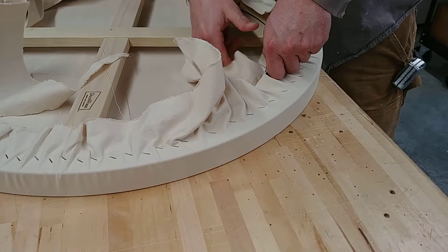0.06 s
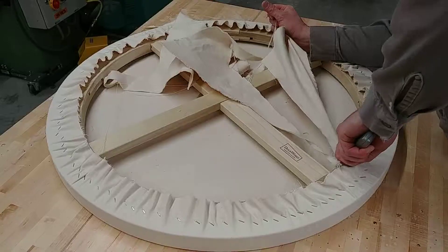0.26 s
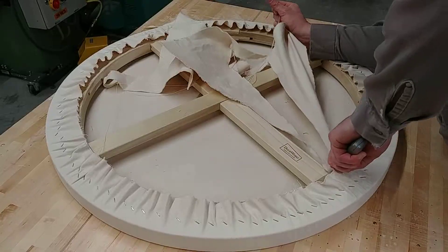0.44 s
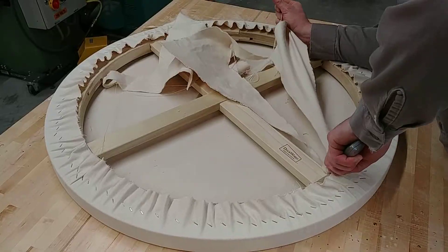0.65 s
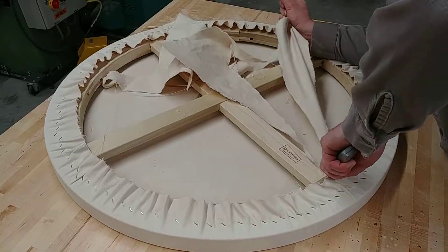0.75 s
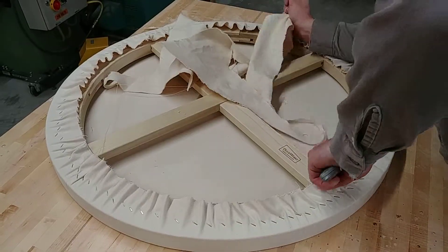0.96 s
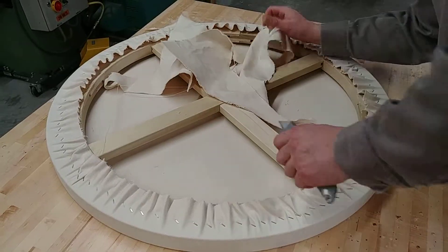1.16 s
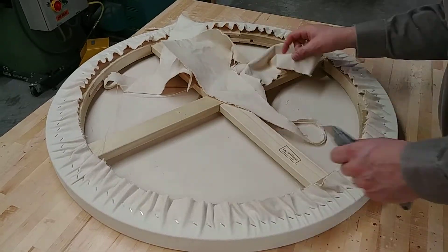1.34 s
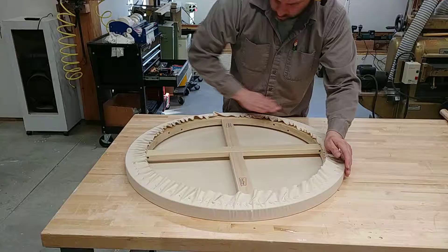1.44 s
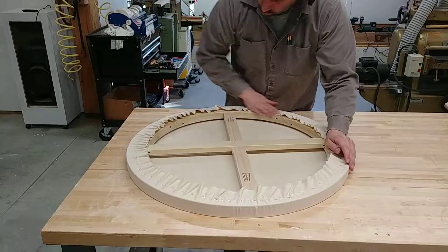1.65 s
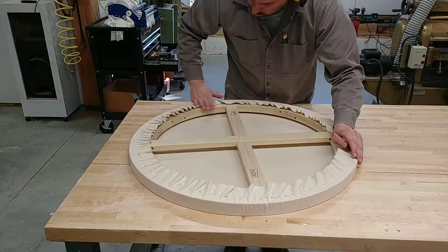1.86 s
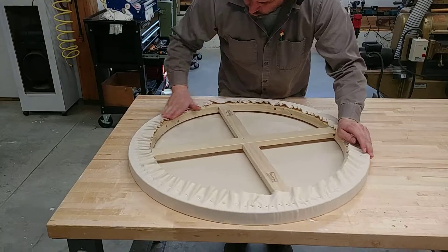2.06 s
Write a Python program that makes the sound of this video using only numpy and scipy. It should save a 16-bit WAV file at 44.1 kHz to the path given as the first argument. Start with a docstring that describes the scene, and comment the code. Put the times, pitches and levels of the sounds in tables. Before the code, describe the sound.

A knife cuts canvas in four harsh strokes, then cloth and hands brush softly.

```python
"""In a dry workshop, a knife trims spare canvas from a round wooden stretcher in four short strokes.
Threads snap one by one under the juddering blade and excite the modes of the frame. At 0.87 s the last
stroke ends in a knock on the wood. Friction then takes over: the cut strip is pulled away, cloth and
hands brush over the taut canvas, which drums softly, and from 1.6 s the frame slides on the bench."""
import sys
import numpy as np
from scipy import signal
from scipy.fft import rfft, irfft
from scipy.io import wavfile
from scipy.ndimage import uniform_filter1d

SR = 44100
rng = np.random.default_rng(int(sys.argv[2]) if len(sys.argv) > 2 else 0)


def generate_wav(signal):
    """Clip the signal to [-1, 1] and save it as 16-bit WAV at the path in sys.argv[1]."""
    frames = np.transpose(np.atleast_2d(signal))
    scaled = np.clip(frames, -1, 1) * 32767
    pcm = np.round(scaled).astype(np.int16)
    wavfile.write(sys.argv[1], SR, pcm)


N = 92610
T = np.arange(N) / SR


def amp(db):
    """Amplitude ratio of a level in decibels."""
    return 10 ** (np.asarray(db) / 20)


def unit(x):
    """Normalisation to rms 1."""
    return x / np.sqrt(np.mean(x ** 2))


def unit_energy(x):
    """A response of unit energy passes white noise at the same level."""
    return x / np.sqrt(np.sum(x ** 2))


def convolve(x, response):
    """Superposition: each sample of x launches a copy of the impulse response."""
    return signal.fftconvolve(x, response)[:N]


def on_log_axis(hz, points_hz, values):
    """Linear interpolation over log frequency."""
    return np.interp(np.log(hz + 1), np.log(np.sort(points_hz)), values)


def colour(x, points):
    """Minimum-phase filter through (frequency_hz, gain_db) points."""
    hz, db = np.array(points).T
    bins_hz = np.arange(N + 1) * SR / (2 * N)
    cepstrum = irfft(np.log(amp(on_log_axis(bins_hz, hz, db))))
    cepstrum[1:N] *= 2  # folding onto positive time makes the filter causal
    cepstrum[N + 1:] = 0
    return irfft(rfft(x, 2 * N) * np.exp(rfft(cepstrum)))[:N]


def clicks(rows):
    """Impulsive excitation, one impulse for each (time_s, level_db)."""
    out = np.zeros(N)
    for at, db in rows:
        out[int(at * SR)] += amp(db)
    return out


def ring(hz, t60):
    """Free decay of one damped mode."""
    return unit_energy(np.sin(2 * np.pi * hz * T) * np.exp(-np.log(1000) * T / t60))


def burst(decay_s):
    """Exponential decay of white noise."""
    return unit_energy(rng.standard_normal(N) * np.exp(-T / decay_s))


def effort(rows, edge_s):
    """Amplitude envelope: each stroke passes through three levels and has Gaussian edges."""
    out = np.zeros(N)
    for start, mid, end, *levels_db in rows:
        outside_s = np.maximum(start - T, 0) + np.maximum(T - end, 0)
        level = amp(np.interp(T, [start, mid, end], levels_db))
        out = np.maximum(out, level * np.exp(-(outside_s / edge_s) ** 2))
    return out


def grains(per_s, scatter_db):
    """Shot noise: random tiny clicks of uneven size, rms 1."""
    size = amp(scatter_db * np.clip(rng.standard_normal(N), -2, 2))
    polarity = np.sign(rng.standard_normal(N))
    return unit(size * polarity * (rng.random(N) < per_s / SR))


# Spectrum of the workshop's background: frequency_hz, gain_db
AIR_SPECTRUM = [(30, -65), (70, 1), (200, 7), (500, 7), (1500, -2), (4000, -2), (7500, -10), (11000, -5.5),
                (16000, 1.5)]
AIR_DB, AIR_START_S = -51, .191


def air():
    """Stationary noise: a faint background that sets in just before the first stroke."""
    return amp(AIR_DB) * colour(rng.standard_normal(N) * (T > AIR_START_S), AIR_SPECTRUM)


# Reverberation by band: frequency_hz, t60_s, level_db
ROOM_BANDS = [(150, 0.38, 4.5), (500, 0.59, 1.5), (1430, 0.52, 0), (4300, 0.35, 3), (8100, 0.32, -2.5),
              (14000, 0.24, -5.5)]
BENCH_DB, BENCH_DECAY_S, ROOM_GAP_S = -11.5, 0.003, 0.0069


def workshop(x, room_db):
    """Reverberation: direct sound, early bench reflections, then a tail whose treble dies first."""
    hz, _, cells = signal.stft(rng.standard_normal(N), SR, nperseg=256)
    band_hz, t60, db = np.array(ROOM_BANDS).T
    age = np.linspace(0, N / SR, cells.shape[1])
    decay = np.exp(-np.log(1000) * age / on_log_axis(hz, band_hz, t60)[:, None])
    gain = amp(on_log_axis(hz, band_hz, db))[:, None]
    diffuse = signal.istft(cells * decay * gain, SR)[1][:N]
    tail = unit_energy(diffuse * (T > ROOM_GAP_S))
    return x + convolve(x, amp(BENCH_DB) * burst(BENCH_DECAY_S) + amp(room_db) * tail)


# Modes of the taut canvas: pitch_hz, bandwidth_hz, level_db
CANVAS_MODES = [(67.1, 2.1, 0.5), (137.3, 17, -5.5), (194, 71, -11.5)]
# Hands pressing on it: start_s, mid_s, end_s, start_db, mid_db, end_db
HAND_PRESSES = [(.88, .90, 1.03, -34, -40, -53), (1.16, 1.19, 1.23, -56, -46.5, -63),
                (1.30, 1.38, 2, -56, -54.5, -63), (1.73, 1.76, 2, -37, -40, -52),
                (1.835, 1.865, 1.895, -39, -36, -40), (1.95, 1.98, 2.06, -51, -47.5, -45)]
CANVAS_IDLE_DB = -59.5


def drumming():
    """Forced vibration of a membrane: rubbing hands keep the low modes of the canvas sounding."""
    out = np.zeros(N)
    for hz, width, db in CANVAS_MODES:
        pole = np.exp((2j * hz - width) * np.pi / SR)
        mode = signal.lfilter([1], [1, -pole], rng.standard_normal(N))
        steadied = mode.real / (np.abs(mode) + np.std(mode) / 2)
        out += amp(db) * unit(steadied)
    idle = amp(CANVAS_IDLE_DB) * (T > AIR_START_S)
    return out * np.maximum(effort(HAND_PRESSES, edge_s=0.015), idle)


# Light touches of fingers and knife handle: time_s, tick_db, thud_db
LIGHT_TOUCHES = [(1.467, -44, -15), (1.627, -23, -20)]


def touches():
    """Impulse response of a membrane: each touch gives a tick and a damped thud of the canvas."""
    thud = sum(amp(db) * ring(hz, t60=0.085) for hz, _, db in CANVAS_MODES)
    ticks = clicks([(at, db) for at, db, _ in LIGHT_TOUCHES])
    pushes = clicks([(at, db) for at, _, db in LIGHT_TOUCHES])
    return ticks + convolve(pushes, thud)


# Brushed cloth, pulled strip, sliding frame: start_s, mid_s, end_s, start_db, mid_db, end_db
CLOTH_SWISHES = [(.87, .91, 1.12, -37, -48, -55), (1.152, 1.19, 1.222, -49.5, -47, -47.5),
                 (1.356, 1.452, 1.456, -44.5, -38, -42.5), (1.60, 1.67, 1.69, -60, -47, -39),
                 (1.695, 1.855, 1.95, -41, -36, -40), (1.95, 2.06, 2.205, -43, -41.5, -37)]
STRIP_PULLS = [(.89, .935, 1.025, -21, -14, -37), (.99, 1.055, 1.113, -34, -27, -38),
               (1.13, 1.21, 1.33, -41, -37, -58)]
FRAME_SLIDES = [(1.635, 1.69, 1.85, -44, -38.5, -47.5), (1.91, 2.05, 2.12, -36.5, -27.5, -29.5)]
# Their spectra, in turn bright, hollow and dull: frequency_hz, gain_db
CLOTH_SPECTRUM = [(60, -23), (300, 0), (700, -4), (1500, 0), (2400, 3), (3400, 5), (4500, -1.5), (5600, -1),
                  (7600, -5.5), (9500, -2), (13000, -1.5), (16000, -10)]
STRIP_SPECTRUM = [(60, -5), (180, -5.5), (280, -2.5), (380, 7), (480, -1), (580, -11.5), (700, -7.5),
                  (900, -14.5), (2000, -27), (16000, -45)]
SLIDE_SPECTRUM = [(60, -21.5), (200, -3), (420, 0.5), (750, 1), (1300, 0.5), (2000, -9.5), (4000, -27),
                  (16000, -49)]


def rubbing():
    """Friction noise: the nap of the cloth and the sliding frame catch in dense tiny grains."""
    def rub(moves, spectrum):
        return colour(grains(per_s=7000, scatter_db=0.5) * effort(moves, edge_s=0.013), spectrum)

    cloth = rub(CLOTH_SWISHES, CLOTH_SPECTRUM)
    strip = rub(STRIP_PULLS, STRIP_SPECTRUM)
    return cloth + strip + rub(FRAME_SLIDES, SLIDE_SPECTRUM)


# The blade juddering against the frame: start_s, mid_s, end_s, start_db, mid_db, end_db
BLADE_JUDDERS = [(.20, .24, 0.26, -39.5, -39, -38), (.263, .288, 0.33, -32.5, -29.5, -47.5),
                 (.455, .481, 0.51, -33.5, -35, -41), (.70, .705, .722, -38, -41.5, -36),
                 (.815, .83, .852, -49, -41, -44)]
JUDDER_HZ, JUDDER_WOBBLE_HZ, JUDDER_ROUGHNESS = 534.3, 21.6, .25


def judder():
    """Stick-slip oscillation: the hard-pressed blade gives a woody note of unsteady pitch."""
    wobble, rough = (unit(uniform_filter1d(rng.standard_normal(N), size=256)) for _ in range(2))
    phase = 2 * np.pi * np.cumsum(JUDDER_HZ + JUDDER_WOBBLE_HZ * wobble) / SR
    note = unit(np.sin(phase) * (1 + JUDDER_ROUGHNESS * rough))
    return note * effort(BLADE_JUDDERS, edge_s=0.0033)


# Modes of the wooden frame: pitch_hz, t60_s, under_blade_db, in_knock_db
FRAME_MODES = [(120.7, 0.14, -21.5, -22), (218.7, 0.22, -25, -7.5), (340.3, 0.16, -18.5, -12.5),
               (385, 0.098, -27, -13.5), (488, 0.056, -22, -8), (526, 0.044, -28, -13),
               (646, 0.31, -25.5, -19.5), (858, 0.047, -15, -19), (1022, 0.02, -16.5, -21.5),
               (1141, 0.066, -34, -16.5), (1591, 0.03, -27, -9.5), (1925, 0.017, -15, -14),
               (2144, .03, -44, -17.5), (3207, 0.044, -16.5, -52), (3640, 0.016, -19.5, -30)]
UNDER_BLADE, IN_KNOCK = 2, 3  # level columns


def frame(column):
    """Modal superposition: the frame's response, neighbouring modes swinging opposite ways."""
    return sum((-1) ** k * amp(mode[column]) * ring(hz=mode[0], t60=mode[1])
               for k, mode in enumerate(FRAME_MODES))


# Spectrum of the knock's crack: frequency_hz, gain_db
CRACK_SPECTRUM = [(100, 2), (2000, 1.5), (5000, -0.5), (7500, -4.5), (11000, -3), (16000, -16)]
KNOCK_S, KNOCK_DB, KNOCK_CRACK_DB = .8665, 10, -7


def knock():
    """Impact excitation: the knife comes free and hits the frame with a crisp crack."""
    crack = amp(KNOCK_CRACK_DB) * colour(burst(decay_s=.0025), CRACK_SPECTRUM)
    blow = clicks([(KNOCK_S, KNOCK_DB)])
    return workshop(convolve(blow, frame(IN_KNOCK) + crack), room_db=-10.5)


# Strong threads that snap: time_s, relative_level_db
THREAD_SNAPS = [(0.2051, -4), (0.2108, 3), (.2185, -26), (.2252, -25), (.2345, -3.5), (0.2461, 3),
                (0.2552, -1.5), (0.261, 4), (.2671, -1), (0.2841, 0), (0.2977, -8), (0.4039, -2),
                (0.4427, -6), (.4574, -3), (.4610, 3), (0.466, 2), (.4670, -1), (0.4737, 1), (0.4763, 0),
                (0.4782, 1.5), (0.483, -3), (0.488, -1.5), (.5124, -5.5), (0.6894, -3), (0.6974, -6),
                (0.6994, 4), (0.7082, 1), (.7163, 1), (0.717, -28), (.7203, -37), (0.726, -6),
                (0.802, -6.5), (0.8049, -6), (0.814, -4.5), (0.826, -4), (.8377, 1), (.8420, -4),
                (0.851, -4)]
ZIP_HZ, ZIP_SPREAD_HZ, ZIP_WIDTH_S, ZIP_DB, SNAP_CRACK_DB = 7940, 740, 0.000407, -21, -7.5


def threads():
    """Sudden release of tension: each thread parts with a crack and a brief zip at its own pitch."""
    zips = np.zeros(N)
    for at, db in THREAD_SNAPS:
        age = T - at - ZIP_WIDTH_S
        near = np.abs(age) < 3 * ZIP_WIDTH_S
        hz = ZIP_HZ + ZIP_SPREAD_HZ * rng.uniform(-0.75, 1)
        tone = np.cos(2 * np.pi * (hz * age[near] + rng.random()))
        zips[near] += amp(db) * tone * np.exp(-(age[near] / ZIP_WIDTH_S) ** 2)
    return amp(SNAP_CRACK_DB) * clicks(THREAD_SNAPS) + amp(ZIP_DB) * zips


# The blade cutting canvas and bearing on wood: start_s, mid_s, end_s, start_db, mid_db, end_db
KNIFE_STROKES = [(.201, .263, 0.35, -26.5, -26.5, -42), (.404, .478, 0.51, -31.5, -27.5, -30.5),
                 (.700, .719, .728, -31, -22, -24.5), (.804, .840, 0.86, -34.5, -32.5, -34.5)]
BLADE_ON_WOOD = [(.20, .288, 0.27, -24.5, -32, -23), (.41, .48, 0.48, -36, -20, -24),
                 (.69, .72, .73, -25.5, -28, -45), (.80, .845, .865, -28, -38.5, -27)]
# Spectrum of the scraping edge: frequency_hz, gain_db
EDGE_SPECTRUM = [(40, -31.5), (120, 5), (250, 2), (550, 4), (1000, 2.5), (2000, 2.5), (3200, -1),
                 (5000, -1), (8000, -1), (11000, -0.5), (16000, -1.5)]
SCRAPE_DB, STROKE_EDGE_S, SNAP_TO_WOOD_DB = -3.5, .004, -9
FRAY_DB, FRAY_DECAY_S = -4.5, 0.0019  # loose fibres that part just after a thread


def knife():
    """Fracture and friction: the edge scrapes, parts fibres and threads, and drives the frame's modes."""
    fibres = unit(grains(per_s=1500, scatter_db=1.5) + amp(SCRAPE_DB) * rng.standard_normal(N))
    snaps = clicks(THREAD_SNAPS)
    fray_power = convolve(snaps ** 2, unit_energy(np.exp(-T / FRAY_DECAY_S)) ** 2)
    fray = np.sqrt(np.abs(fray_power)) * rng.standard_normal(N)
    cutting = fibres * effort(KNIFE_STROKES, STROKE_EDGE_S) + amp(FRAY_DB) * fray
    cloth = colour(cutting, EDGE_SPECTRUM) + threads()
    force = fibres * effort(BLADE_ON_WOOD, STROKE_EDGE_S) + amp(SNAP_TO_WOOD_DB) * snaps
    wood = convolve(force, frame(UNDER_BLADE))
    # the frame is close, so less of it comes back from the room
    return workshop(cloth, room_db=-8) + workshop(wood, room_db=-10)


def scene():
    """Linear superposition of all sources, alike in both channels."""
    mono = air() + knife() + judder() + knock() + rubbing() + drumming() + touches()
    return np.array([mono, mono])


# Response of the microphone, whose port rings near 7.6 kHz: frequency_hz, gain_db
MIC_RESPONSE = [(20, -33), (45, -5.5), (62, -2.5), (3500, -0.5), (4400, -0.5), (5600, 4), (6500, 10),
                (7300, 15.5), (8250, 12.5), (9100, 3), (10200, 1.5), (11500, -5), (13200, -9), (14800, -5),
                (16000, -11)]
PEAK_LIMIT, CUTOFF_HZ = .95, 15900


def record(dry):
    """Port resonance lifts the treble, soft saturation rounds the peaks and a low-pass cuts the top."""
    heard = np.array([colour(channel, MIC_RESPONSE) for channel in dry])
    rounded = heard / (1 + (heard / PEAK_LIMIT) ** 4) ** .25
    return signal.sosfilt(signal.ellip(10, .2, 70, CUTOFF_HZ, fs=SR, output="sos"), rounded)


dry = scene()
out = record(dry)
generate_wav(out)
```